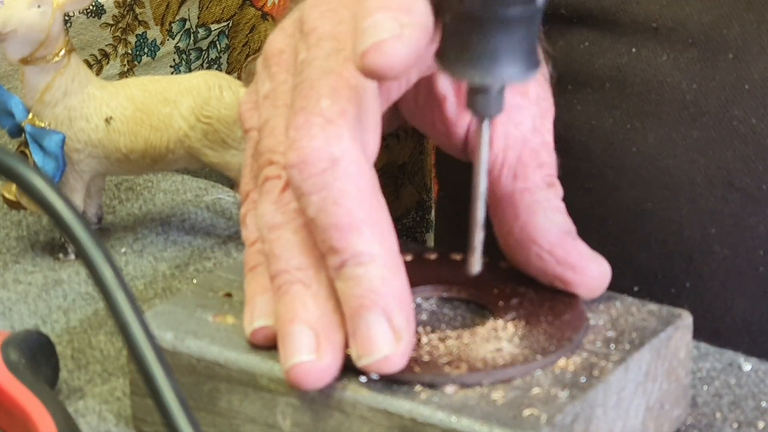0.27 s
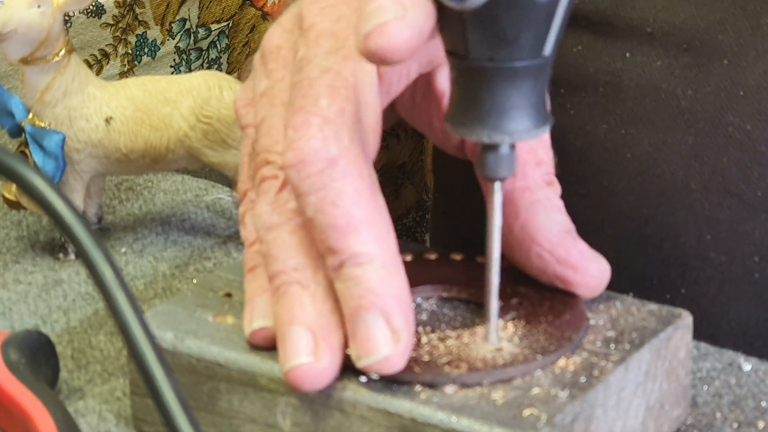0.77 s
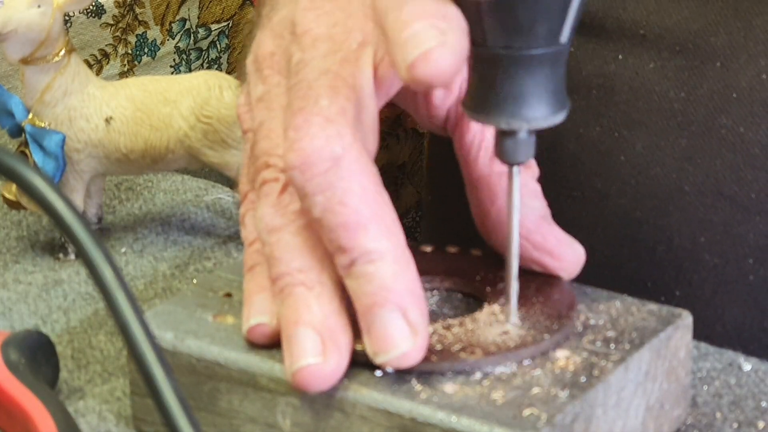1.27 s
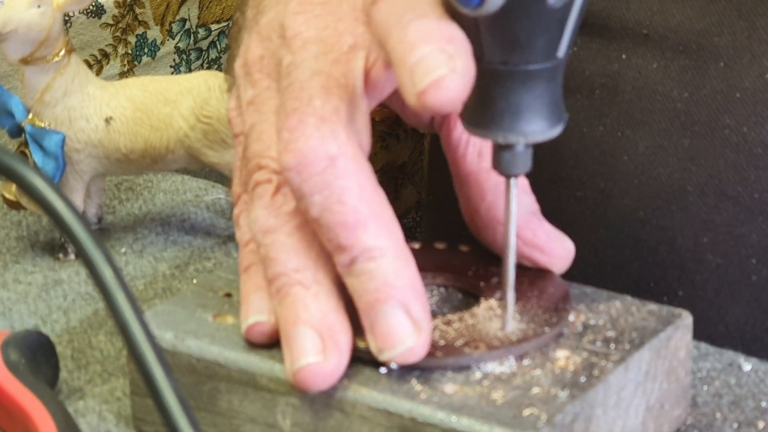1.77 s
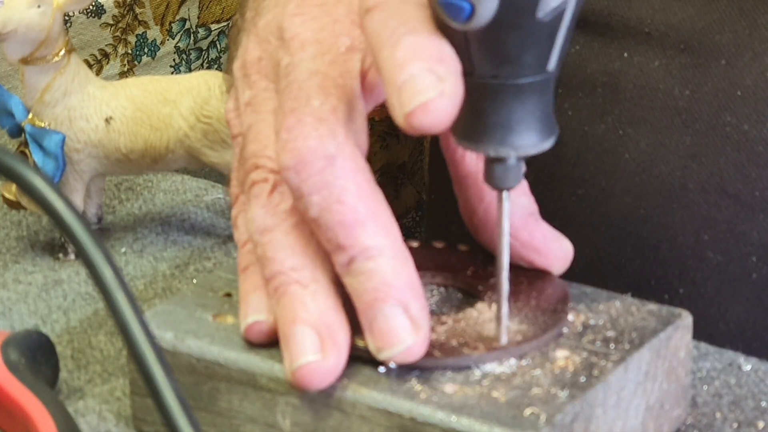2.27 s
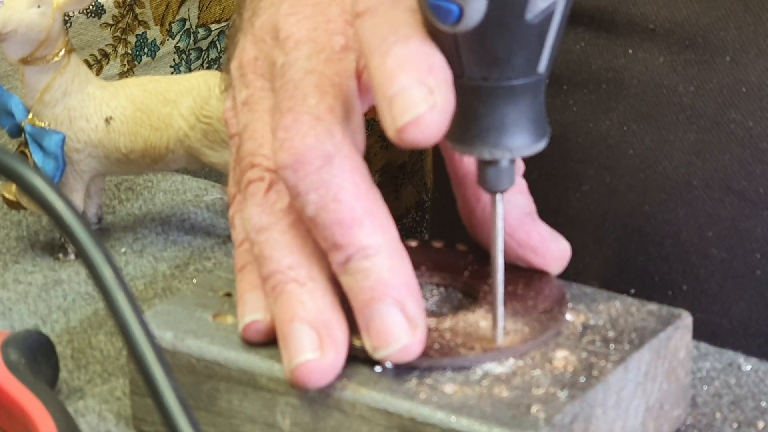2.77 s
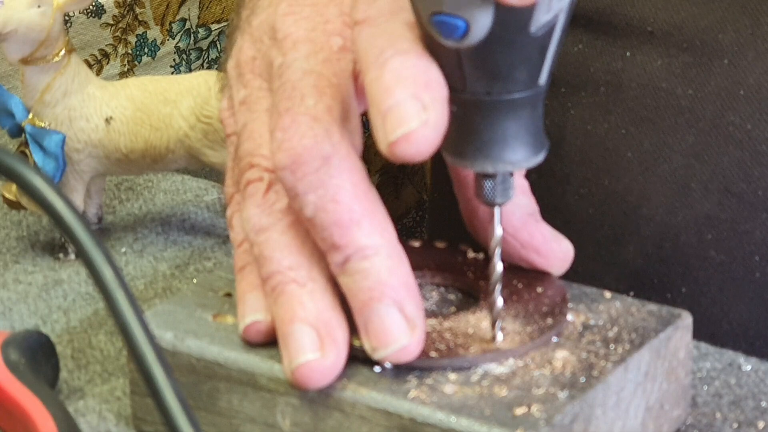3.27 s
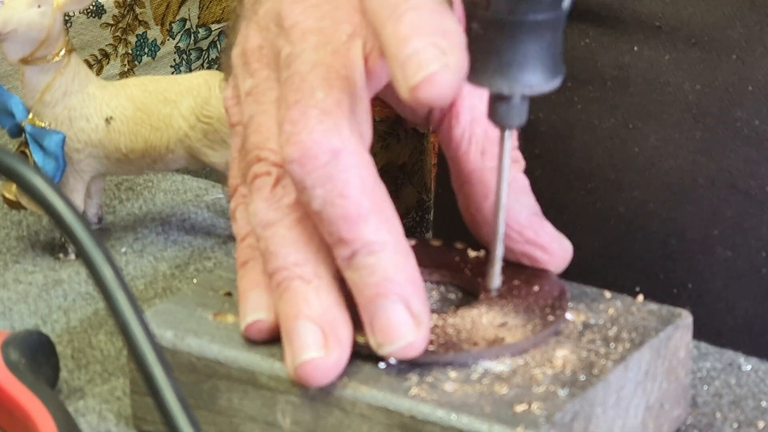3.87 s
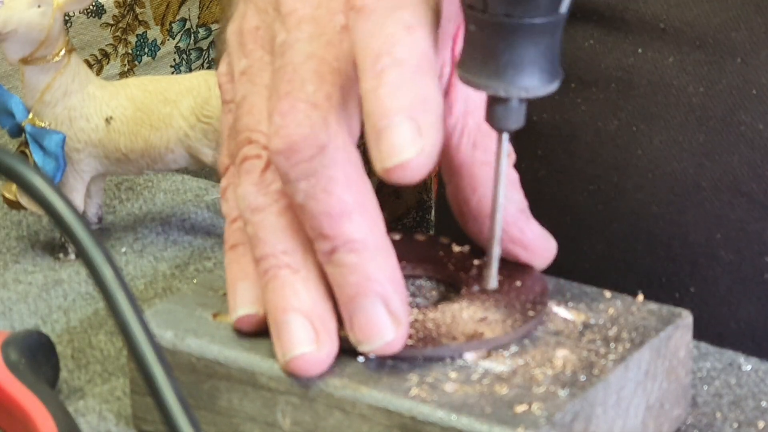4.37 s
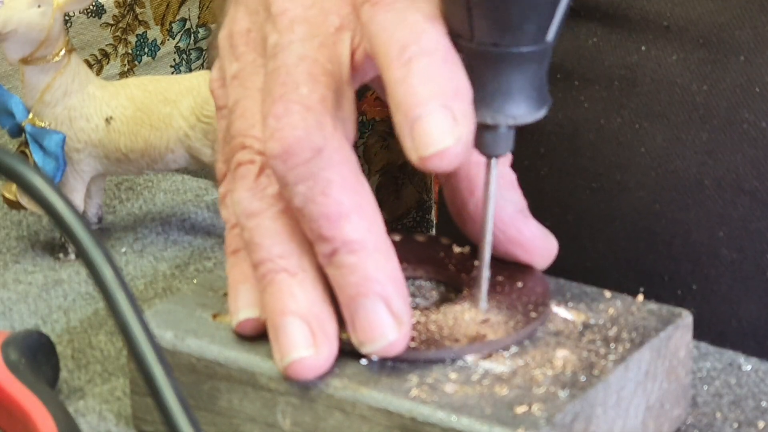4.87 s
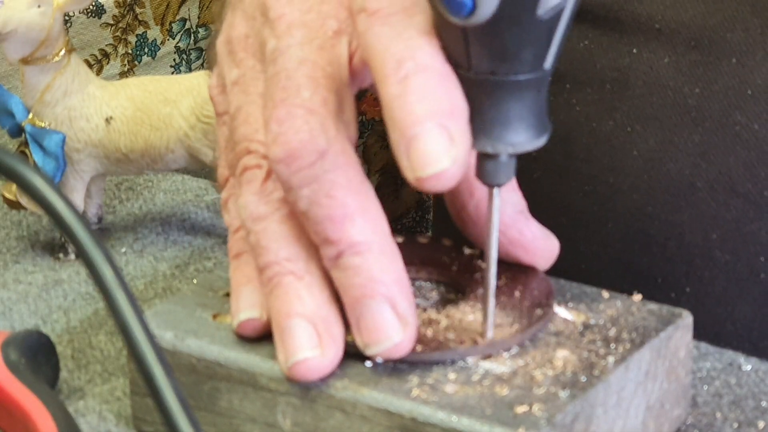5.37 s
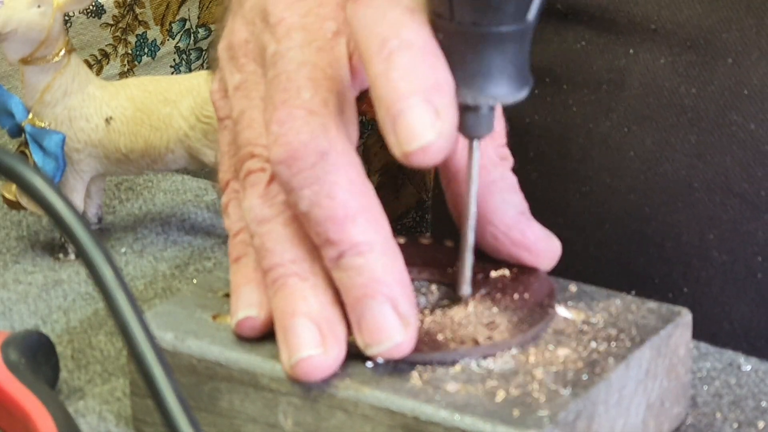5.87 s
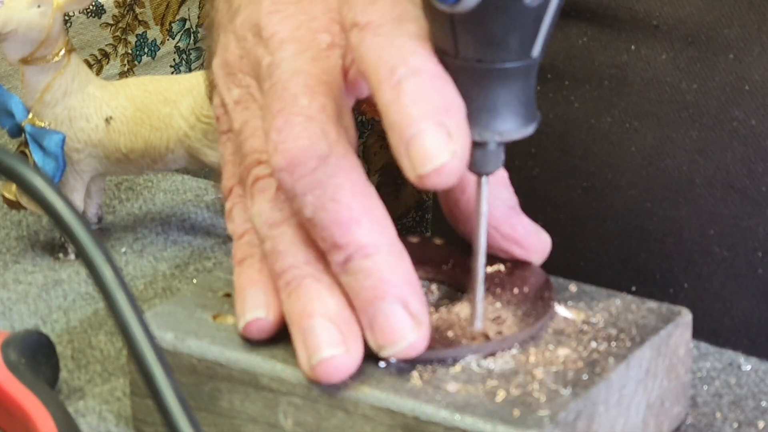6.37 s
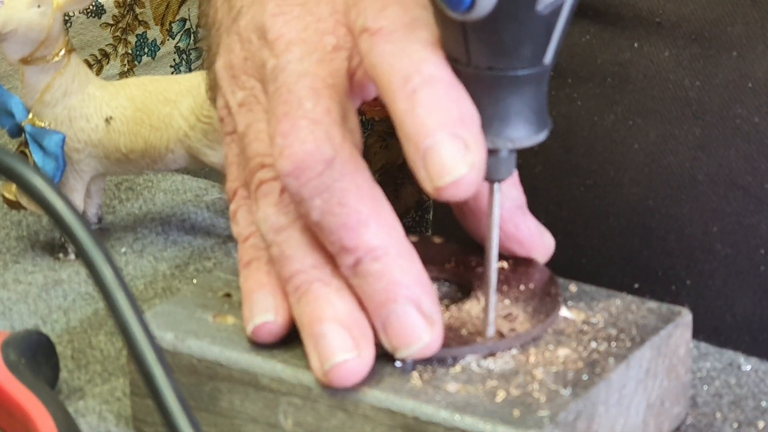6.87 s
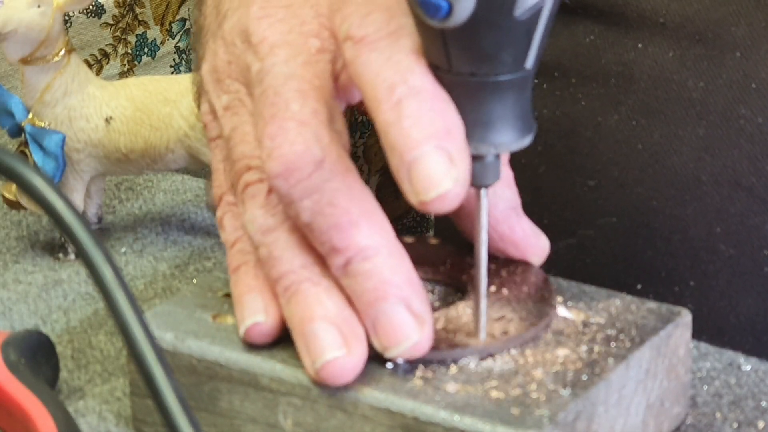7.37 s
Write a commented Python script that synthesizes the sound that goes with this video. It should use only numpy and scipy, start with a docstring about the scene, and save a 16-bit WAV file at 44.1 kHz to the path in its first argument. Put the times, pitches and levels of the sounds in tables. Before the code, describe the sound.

Close stereo pickup in a quiet room: a small rotary tool lightly scrapes a hard plate, then spins up to a steady whirring whine. It grinds loudly with rattling chatter, its pitch sagging until it stalls briefly. It winds up again, cuts in a short jolting burst, runs free, and ends in another rough, slowing grind. Faint hiss and rumble lie behind.

```python
"""Rotary tool drilling a hard plate

A small battery tool drills a plate on a wooden block, close to a pair of microphones, in a quiet room.
Running free it spins up: brush ticks, bearing whirr and shaft tones, plus the whine of its switched drive.
Pressed down, the bit grinds (shaft orders and noise through plate modes) and chatters; the shaft slows and
once stalls. Catches ring the plate, a dull knock sounds on the block; hiss, rumble and hum lie behind.
"""
import sys
import numpy as np
from scipy import signal
from scipy.fft import rfft, irfft
from scipy.io import wavfile
from scipy.ndimage import uniform_filter1d

SR = 44100
rng = np.random.default_rng(int(sys.argv[2]) if len(sys.argv) > 2 else 0)


def waveform_to_disk(signal):
    """Save audio, clipped to [-1, 1], as 16-bit WAV at the path in sys.argv[1]."""
    frames = np.transpose(np.atleast_2d(signal))
    scaled = np.clip(frames, -1, 1) * 32767
    samples = np.round(scaled).astype(np.int16)
    wavfile.write(sys.argv[1], SR, samples)


N = 336483
T, HZ = np.arange(N) / SR, np.fft.rfftfreq(N, 1 / SR)

# Shaft held down by each cut: time_s, turns_per_s
HELD = [(0, 88.2), (.1, 87.7), (.19, 85.6), (.28, 88), (.36, 91), (.39, 97.4), (2.25, 136), (2.31, 123.6),
        (2.47, 121.9), (2.64, 113.9), (2.71, 104.8), (2.9, 96.2), (3.05, 84.8), (3.14, 80.4), (3.22, 70.1),
        (5.43, 135.2), (5.5, 133.8), (5.58, 129), (5.66, 117.2), (5.73, 106.8), (5.86, 103.6),
        (5.93, 105.5), (7.08, 136.3), (7.17, 123.3), (7.3, 123.8), (7.4, 120.6), (7.48, 115.1),
        (7.63, 99.5)]
# Shaft let go: start_s, turns_per_s at start, end_s
RELEASES = [(.39, 97.4, 2.16), (3.61, 78.2, 5.36), (5.93, 105.5, 7.02)]
# Shaft at a standstill: start_s, end_s
STALL_S = (3.27, 3.61)
FULL_TURNS_PER_S, SPIN_UP_S = 137.5, .3

# One table a cut: time_s, grind_db, grit_over_grind_db, wobble_db, chatter_db, regular_share
CUTS = [
    [(0, -39.5, 2, -35.5, -48, 0.83), (.07, -41, -0.5, -35.5, -40.5, 0.6), (.15, -41, 2.5, -31, -43.5, 0.7),
     (.2, -35, -5, -32, -37, 0.8), (.27, -43.5, 6, -34.5, -44, 0.6), (.33, -40.5, 5.5, -37, -49.5, 0.3),
     (.375, -38.5, 7, -31, -41, 0.2)],
    [(2.19, -39.5, -10, -31.5, -45, 0.3), (2.23, -49, 0, -49, -54, .1),
     (2.275, -25.5, 0.5, -40, -32.5, 0.26), (2.32, -19.5, -0.5, -35.5, -23, 0.5),
     (2.41, -16.5, -2.5, -41, -23.5, 0.08), (2.47, -15.5, -0.5, -42.5, -19.5, 0.97),
     (2.64, -13.5, -1.5, -38, -28, 0.88), (2.71, -17.5, 3.5, -36, -27, 0.57),
     (2.78, -14.5, -0.5, -32.5, -26.5, 0.74), (2.85, -18.5, 2.5, -36, -31.5, 0.58),
     (2.9, -20.5, 3.5, -31.5, -36, 0.9), (3.0, -18.5, 0, -35.5, -37.5, 0.34),
     (3.14, -22, 5.5, -34.5, -49.5, 0.15), (3.2, -27.5, 11.5, -35.5, -48, 0),
     (3.25, -47.5, 1, -40, -53, 0.14), (3.32, -66, -2, -52, -63, 0)],
    [(3.607, -44.5, 6, -52, -55, 0), (3.64, -42, 11, -48, -52, 0.02), (3.664, -34, 4, -41, -48, 0.12),
     (3.685, -53, -6, -52, -50, 0.13)],
    [(5.389, -28, -4.5, -43, -44, 0), (5.43, -23.5, -3, -32, -34.5, 0.01),
     (5.495, -27.5, -6, -40, -38, 0.07), (5.515, -20.5, 0.5, -32, -34, 0), (5.54, -17, -1, -39, -31, 0.15),
     (5.575, -22, 1.5, -42, -25, 0.03), (5.6, -18, 1, -46, -33, 0.46), (5.64, -31.5, 8, -45, -41, 0.25),
     (5.712, -30, 2.5, -39, -36.5, 0.1), (5.725, -24, 9, -28, -34, 0.2), (5.79, -30.5, 4, -38, -29.5, 0.64),
     (5.86, -31.5, 8, -34, -37.5, 0), (5.89, -31, 2, -44, -48, 0.2)],
    [(7.02, -48, 1, -39.5, -46, 0.74), (7.08, -44, 0, -43.5, -59, 0.1), (7.14, -20, -0.5, -36.5, -24, 0.5),
     (7.22, -21, -4, -41, -28.5, 0), (7.27, -15, -2.5, -48, -20.5, 0.56), (7.4, -16.5, 1, -44, -23, 0.96),
     (7.48, -16.5, -3.5, -40, -28.5, 0.74), (7.55, -18.5, 3, -34.5, -28, 0.53),
     (7.63, -22, 2.5, -32, -29, 0.9)],
]
# Bit only brushes the plate: start_s, length_s, grind_db, grit_over_grind_db, shake_db (wobble and chatter)
BRUSHES = [(0.361, 0.0076, -31.5, 3.5, -37), (2.145, 0.033, -31, -2, -36.5),
           (5.904, 0.011, -25.5, 2.5, -35.5)]
BITE_DB_PER_S, LIFT_DB_PER_S = 1198, 1098  # contact closes, opens
# Bit catches or tears free: time_s, peak_db, ring_hz
JOLTS = [(0.371, -23.5, 1193), (2.271, -16, 1210), (3.665, -22, 1170), (5.389, -15.5, 1194),
         (5.537, -6.5, 1220), (5.725, -14, 238), (5.909, -18, 1990)]
JOLT_RISE_S, JOLT_RING_OVER_PEAK_DB = 0.0021, -0.2
# Modes of plate and block: centre_hz, width_hz, relative_db
PLATE = [(725, 49, 2.5), (1170, 163, 1.5), (1740, 100, 3), (2035, 24, 7.5), (2595, 140, 6.5),
         (3404, 100, 9)]
# Grinding spectrum: freq_hz, relative_db_per_hz
GRIND = [(600, -4), (930, -19.5), (1180, -5), (2070, -3.5), (2850, -7.5), (3100, -16), (5200, -27)]
# Grit hiss spectrum: freq_hz, relative_db_per_hz
GRIT = [(2500, -28), (3500, -5.5), (4200, -4), (6200, -2), (9200, -9.5), (10400, -15.5), (13800, -5),
        (15900, -11)]
# Hollow drumming of the block: time_s, over_grind_db
DRUM = [(0, -3.5), (.13, 2), (.21, -5), (.32, -21), (.37, -8.5), (2.15, -5), (2.27, -13.5), (2.45, -9),
        (2.6, -23), (2.68, -12), (2.8, -29), (3.0, -18), (3.1, -37), (3.664, -16), (5.39, -8), (5.54, -5),
        (5.62, -14), (5.7, -23), (5.73, 0), (5.8, -6), (5.91, -6.5), (7.1, -9), (7.18, -6.5), (7.28, -7.5),
        (7.45, -22)]
# Ringing of the plate mode near 1.2 kHz as the fingers press, before RING_OFFSET_DB: time_s, ring_db
RING = [(.3, -4), (2.3, 5.5), (2.55, -6.5), (2.75, -4.5), (5.5, 4.5), (5.7, -1.5), (7.15, 1.5), (7.35, -4),
        (7.5, 3)]
RING_OFFSET_DB = -4.0
# Both edges cutting alike favour even orders of the turn, one edge alone the odd: time_s, even_over_odd_db
EVEN = [(0, 1.5), (.2, 23), (.28, -2.5), (2.17, 8), (2.3, -2), (2.645, -4), (2.69, 9), (2.85, 17.5),
        (3.0, 4), (3.14, -7), (5.43, 7), (5.58, -7), (5.73, 6.5), (5.8, -11.5), (7.02, 11), (7.1, 3),
        (7.17, -5), (7.4, -3.5), (7.55, 13)]
WOBBLE_EVEN_SHARE = 0.56  # share of that lean felt by the wobble
# Radiation of the shake by the block: freq_hz, gain_db
BLOCK = [(70, 3.5), (125, 1), (180, -7.5), (230, 1.5), (280, 4), (320, -7), (370, -4), (420, -3.5),
         (480, -11.5), (535, -12), (610, -4.5), (660, -6), (720, -8.5), (820, -23)]

# Whirr, before a 1 dB lift: time_s, level_db
WHIRR = [(.44, -42), (1.3, -37.5), (3.6, -42.5), (4.4, -38.5), (5.9, -40.5), (6.95, -40)]
# Whirr spectrum: freq_hz, relative_db_per_hz
WHIRR_COLOUR = [(200, -17), (450, -17.5), (1050, -21), (1240, -6), (2000, -7.5), (2250, -15.5),
                (3300, -17.5), (3620, -26), (4050, -14), (4500, -23), (4950, -11), (5500, -10.5),
                (6500, -15.5), (7150, -5.5), (7800, -15.5), (8600, -14.5), (9200, -23.5), (13000, -17)]
# Whirr that repeats exactly each turn: freq_hz, power_share
TICKS = [(6300, .12), (7100, .7), (8000, .25)]
# Motor tones before HOUSING; broken orders come from the bearing:
# order_per_turn, full_speed_db, gain_db for each turn/s below full speed
MOTOR = [(0.993, -35.5, -0.0658), (9.01, -44.5, -0.1384), (9.86, -48.5, -0.26), (11.12, -50.5, -0.34),
         (11.95, -42, 0.03), (15.1, -53.5, 0.2231)]
# Radiation of the motor tones: freq_hz, gain_db
HOUSING = [(1100, -20), (1210, -2), (1400, 0), (1750, -5)]
# Switched drive split by the commutator:
# shaft_orders beside the switching rate, full_speed_db, gain_db for each turn/s below full speed
WHINE = [(-6, -43.5, -0.1), (-3, -55, -0.0871), (3, -46, -0.13), (5, -57, -0.2054)]
SWITCH_HZ, SWITCH_STALLED_DB, SWITCH_MOVING_DROP_DB = 8014, -62.5, 8  # bare switching tone

# Room hiss spectrum: freq_hz, relative_db_per_hz
ROOM = [(250, -20), (750, -1), (1070, -9), (3500, -18.5), (9000, -31)]
ROOM_DB = -52.5
# Rumble spectrum: freq_hz, relative_db_per_hz
RUMBLE = [(20, -14), (32, 1), (101, -4.5), (190, -5.5), (350, -12.5), (520, -75)]
# Rumble: time_s, level_db
RUMBLE_LEVEL = [(2.5, -51), (3.4, -47.5), (4.5, -45.5), (5.5, -48.5)]
# Low hum that comes and goes: start_s, end_s, mean_hz, mean_peak_db
HUM = (3.6, 4.6, 100, -50)
# Dull knocks on the block: start_s, level_db before decay, pitch_hz, t60_s
KNOCKS = [(6.631, -13, 93, 0.0094)]

# Microphone balance for the tool: freq_hz, left_over_right_db
TOOL_PAIR = [(380, 0), (2400, -0.5), (15000, 3.5)]
# Microphone balance for the plate: freq_hz, left_over_right_db
PLATE_PAIR = [(100, 0.5), (290, 2), (640, -2), (3000, 0.5), (15000, 2.5)]
# Sound alike at both microphones, before the distance power: freq_hz, share
DIRECT = [(60, 0.96), (200, 0.98), (550, 0.27), (5000, 0.064)]
LAG_S = 2 / SR  # the right microphone is a little further off
EDGE_HZ = 15790


def gain_of(db):
    """Decibels to amplitude gain."""
    return 10 ** (np.asarray(db) / 20)


def evened(x):
    """Scale to rms 1."""
    return x / np.sqrt(np.mean(x ** 2) + 1e-20)


def read(points, hz):
    """Interpolate a table on a log-frequency axis."""
    f, value = np.transpose(points)
    return np.interp(np.log(hz + 1), np.log(f + 1), value)


def over_time(points):
    """Interpolate a two-column table over time."""
    return np.interp(T, *np.transpose(points))


def tinted(x, gain):
    """Filter by a gain over frequency, then scale to rms 1."""
    return evened(irfft(rfft(x) * gain, N))


def drift(per_s):
    """Slow random wavering: unit-variance steps joined by straight lines."""
    steps = rng.standard_normal(int(N / SR * per_s) + 2)
    return np.interp(T * per_s, np.arange(len(steps)), steps)


def cosine(turns):
    """Cosine of a phase in turns."""
    return np.cos(2 * np.pi * turns)


def shaft():
    """Speed in turns/s, held by cuts and rising exponentially when free; motion share, 0 in the stall."""
    full_speed = [(end, FULL_TURNS_PER_S) for _, _, end in RELEASES]
    speed = over_time(sorted(HELD + full_speed))
    for start, turns_per_s, end in RELEASES:
        free = (T >= start) & (T < end)
        shortfall = (FULL_TURNS_PER_S - turns_per_s) * np.exp(-(T[free] - start) / SPIN_UP_S)
        speed[free] = FULL_TURNS_PER_S - shortfall
    outside_stall = (T < STALL_S[0]) | (T > STALL_S[1])
    moving = uniform_filter1d(1. * outside_stall, size=2600)
    return uniform_filter1d(speed, size=400), moving


def contact():
    """Grind, grit, wobble, chatter and regularity of whichever touch grinds hardest at each moment."""
    touches = [np.transpose(cut) for cut in CUTS]
    for start, length, grind_db, grit_db, shake_db in BRUSHES:
        rows = [(at, grind_db, grit_db, shake_db, shake_db, 0) for at in (start, start + length)]
        touches.append(np.transpose(rows))
    best = np.full((5, N), -1e9)
    for s, *columns in touches:
        apart_db = BITE_DB_PER_S * np.maximum(s[0] - T, 0) + LIFT_DB_PER_S * np.maximum(T - s[-1], 0)
        now = np.array([np.interp(T, s, c) for c in columns])
        now[[0, 2, 3]] -= apart_db  # grit is relative to grind
        best = np.where(now[0] > best[0], now, best)
    return best


def edge_knocks(turns):
    """Shaft orders 7 to 33; the hole is uneven, so each flickers alone and high ones blur and fade."""
    out = np.zeros(N)
    for k in range(7, 34):
        db = 2.5 * drift(14) + 3.5 * drift(45) - .6 * max(k - 20, 0)
        out += gain_of(db) * cosine(k * turns + .45 * rng.random() + .007 * k * drift(40))
    return out * gain_of(1.6 * drift(110))  # no two turns bite equally hard


def chip_scrape(turns):
    """Sparse chip crackle and steady noise, swelling as the two unequal edges bite each turn."""
    bite = .5 + np.exp(3 * (cosine(turns) - 1)) + .5 * np.exp(-3 * (cosine(turns) + 1))
    sizes = gain_of(2.87 * np.minimum(rng.exponential(1, N), 6))
    chips = sizes * (rng.random(N) < .12) * rng.standard_normal(N)
    noise = evened(chips) + 0.98 * rng.standard_normal(N)
    return bite * noise * gain_of(1.88 * drift(30) + 0.74 * drift(60))


def jolts(body, rings):
    """Each catch strikes the plate modes and starts a short, quickly rising and fading sine."""
    out = np.zeros(N)
    blow = irfft(body * np.exp(1j * np.angle(rings)), N)
    for at, db, hz in JOLTS:
        out += gain_of(db) * np.roll(blow, round(at * SR)) / abs(blow).max()
        u = np.clip(T - at, 0, 1) / JOLT_RISE_S
        ring = u * np.exp(1 - u) * np.sin(2 * np.pi * hz * (T - at))
        out += gain_of(db + JOLT_RING_OVER_PEAK_DB) * ring
    return out


def shake(speed, turns, wobble_db, chatter_db, regular):
    """The bit wobbles once and twice a turn; orders 3 to 8 ring the block."""
    out = np.zeros(N)
    even_db = over_time(EVEN)
    rough = 0.71 * (1 - regular) ** 2  # an irregular cut makes the shake stumble
    for k in range(8):
        order = k + 1
        level_db, lean = (wobble_db, WOBBLE_EVEN_SHARE) if order <= 2 else (chatter_db, 1)
        db = level_db + (-1) ** order * lean * even_db / 2
        db = db + read(BLOCK, order * speed) + 2.0 * drift(7.9)
        loose = rough * (.25 if order == 1 else 1)  # the once-a-turn wobble stays firmer
        steady = np.sqrt(1 - loose) + np.sqrt(loose) * (drift(90) + 1j * drift(90))
        wave = steady * np.exp(2j * np.pi * (order * turns + rng.random()))
        out += np.sqrt(2) * gain_of(db) * wave.real
    return out


def bit(speed):
    """Edges knock and scrape the plate each turn, chips crackle, and the bit shakes in the hole."""
    grind_db, grit_db, wobble_db, chatter_db, regular = contact()
    regular = np.clip(regular, 0, 1)
    turns = np.cumsum(speed * (1 + 0.00198 * drift(60))) / SR

    rings = np.zeros(len(HZ), complex)
    for k, (hz, width_hz, db) in enumerate(PLATE):
        rings += (-1) ** k * gain_of(db) / (1 + 2j * (HZ - hz) / width_hz)
    body = gain_of(read(GRIND, HZ)) * (abs(rings) + 1.08)
    high = 1 / (1 + (1050 / (HZ + 1)) ** 16)
    low = (1 - high) / (1 + (640 / (HZ + 1)) ** 16)
    mode = 1 / (1 + (2 * (HZ - PLATE[1][0]) / 330) ** 4)

    knock, scrape = edge_knocks(turns), chip_scrape(turns)
    snap = np.diff(np.floor(turns), prepend=0) * gain_of(4.8 * drift(150))  # one edge catches once a turn
    grit = evened(scrape) + 0.064 * regular * evened(snap)
    out = gain_of(grind_db + grit_db) * tinted(grit, gain_of(read(GRIT, HZ)))

    ring_db = grind_db + RING_OFFSET_DB + over_time(RING)
    drum_db = grind_db + over_time(DRUM)
    for db, band in ((grind_db, high * (1 - mode)), (ring_db, high * mode), (drum_db, low)):
        knocked, scraped = tinted(knock, body * band), tinted(scrape, body * band)
        out += gain_of(db) * (np.sqrt(regular) * knocked + np.sqrt(1 - regular) * scraped)
    return out + jolts(body, rings) + shake(speed, turns, wobble_db, chatter_db, regular)


def room():
    """Faint hiss, a wavering low rumble and a passing hum."""
    hiss = gain_of(ROOM_DB) * tinted(rng.standard_normal(N), gain_of(read(ROOM, HZ)))
    rumble = tinted(rng.standard_normal(N), gain_of(read(RUMBLE, HZ)))
    rumble *= gain_of(over_time(RUMBLE_LEVEL))
    start, end, hz, db = HUM
    on = np.clip(10 * np.minimum(T - start, end - T), 0, 1)
    hum_turns = np.cumsum(hz + 2 * drift(10)) / SR
    hum = on * gain_of(db + 2 * drift(20)) * np.sin(2 * np.pi * hum_turns)
    return hiss + rumble + hum


def each_turn(turns, size):
    """A random pattern laid round the shaft, played again on every turn."""
    pattern = rng.standard_normal(size)
    return np.interp(turns % 1 * size, np.arange(size + 1), np.append(pattern, pattern[0]))


def whirr(turns):
    """Brush ticks that repeat each turn, and bearing noise fluttering with the commutator."""
    colour = gain_of(read(WHIRR_COLOUR, HZ))
    ticks = tinted(each_turn(turns, size=300), colour)
    # three commutator segments, one of them proud
    flutter = 1 + 0.96 * cosine(3 * turns) + 0.19 * cosine(turns)
    air = tinted(rng.standard_normal(N) * flutter, colour)
    share = read(TICKS, HZ)
    mixed = irfft(np.sqrt(share) * rfft(ticks) + np.sqrt(1 - share) * rfft(air), N)
    return mixed * gain_of(over_time(WHIRR) + 1.0 + 0.25 * drift(11))


def motor_tones(speed, turns, below):
    """Shaft and bearing orders radiated by the housing."""
    out = np.zeros(N)
    settled = np.clip(abs(T - STALL_S[1]) / 0.16, 0, 1) ** 2  # tones dip around the end of the stall
    for order, db, db_per_turn in MOTOR:
        radiated_db = db + read(HOUSING, order * speed) + db_per_turn * below
        flicker_db = 3 * drift(10) + 2 * drift(50)
        tone = cosine(order * turns + rng.random())
        out += np.sqrt(2) * settled * gain_of(radiated_db + flicker_db) * tone
    return out


def drive_whine(turns, moving, below):
    """Switching whine split by the commutator into tones offset by shaft orders."""
    out = np.zeros(N)
    for order, db, db_per_turn in WHINE:
        level = gain_of(db + db_per_turn * below + drift(11))
        out += np.sqrt(2) * moving ** 4 * level * cosine(SWITCH_HZ * T + order * turns + rng.random())
    return out


def switching_tone(moving):
    """Bare switching tone of the drive, louder while the shaft stands."""
    db = SWITCH_STALLED_DB - SWITCH_MOVING_DROP_DB * moving + 1.6 * drift(29.3)
    return np.sqrt(2) * gain_of(db) * cosine(SWITCH_HZ * T + rng.random())


def motor(speed, moving):
    """Sounds of the turning shaft fade in the stall; the bare switching tone goes on."""
    turns = np.cumsum(speed) / SR
    below = np.minimum(FULL_TURNS_PER_S - speed, 50)
    turning = whirr(turns) + motor_tones(speed, turns, below) + drive_whine(turns, moving, below)
    return moving * turning + switching_tone(moving)


def knocks():
    """A low damped thud of the block."""
    out = np.zeros(N)
    for start, db, hz, t60 in KNOCKS:
        t = np.maximum(T - start, 0)
        out += gain_of(db - 60 * t / t60) * np.sin(2 * np.pi * hz * t)
    return out


def heard(near, balance, distance):
    """Both microphones hear the direct sound; side reflections arrive with opposite signs, more from afar."""
    hz = np.fft.rfftfreq(8192, 1 / SR)
    same = np.clip(read(DIRECT, hz), 0, 1) ** distance
    steps = rng.uniform(-np.pi, 0, 1600)
    phase = np.interp(hz / 32, np.arange(len(steps)), np.cumsum(steps))  # delays up to 16 ms
    direct = np.sqrt((1 + same) / 2)
    side = np.sqrt((1 - same) / 2) * np.exp(1j * phase)
    late = np.exp(-2j * np.pi * hz * LAG_S)
    tilt = gain_of(read(balance, hz) / 2)
    paths = irfft([(direct + side) * tilt, (direct - side) * late / tilt])
    centred = np.fft.fftshift(paths, axes=1)
    return signal.oaconvolve(near[None], centred, axes=1)[:, 4096:4096 + N]


def scene():
    """Tool, room and knocks share one direction; the plate has its own."""
    speed, moving = shaft()
    plate = heard(bit(speed), PLATE_PAIR, distance=0.85)
    tool = heard(room() + motor(speed, moving) + knocks(), TOOL_PAIR, distance=0.91)
    return plate + tool


def record(dry):
    """Round off the strongest peaks, then limit the band."""
    rounded = .97 * np.tanh(dry / .97)
    lowpass = signal.firwin(1023, EDGE_HZ, window=("kaiser", 9), fs=SR)
    return signal.oaconvolve(rounded, lowpass[None], "same")


dry = scene()
out = record(dry)
waveform_to_disk(out)
```